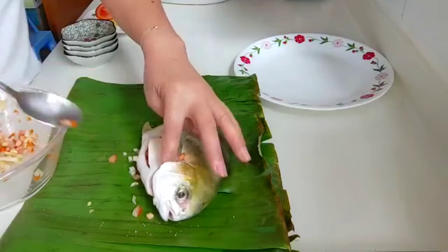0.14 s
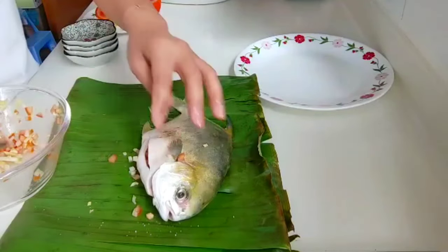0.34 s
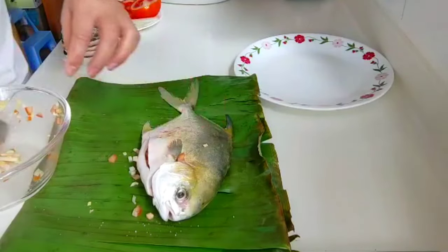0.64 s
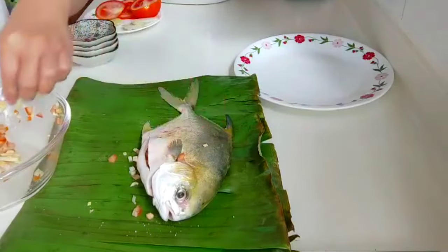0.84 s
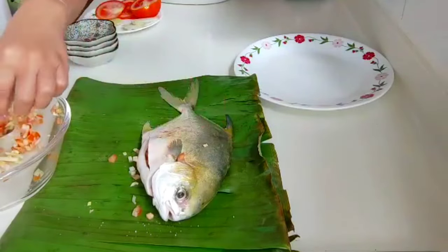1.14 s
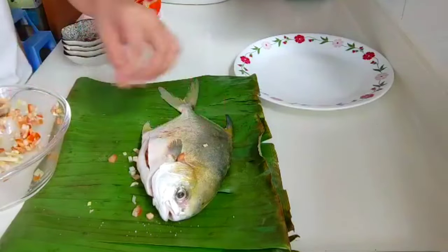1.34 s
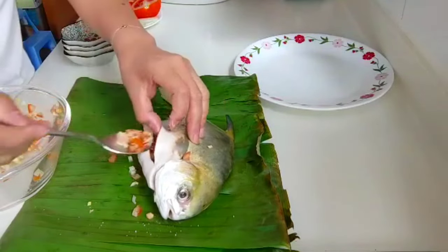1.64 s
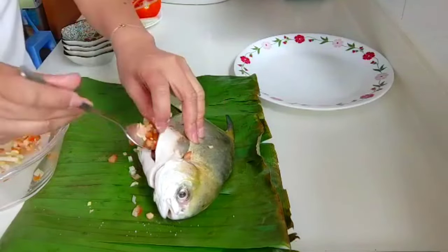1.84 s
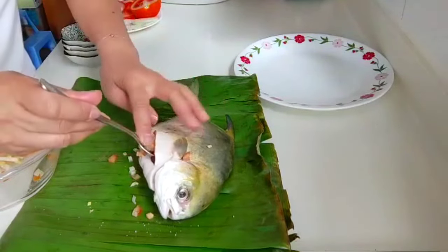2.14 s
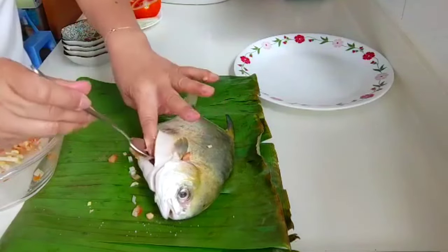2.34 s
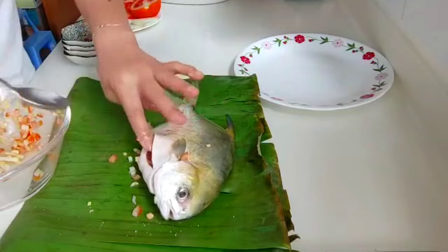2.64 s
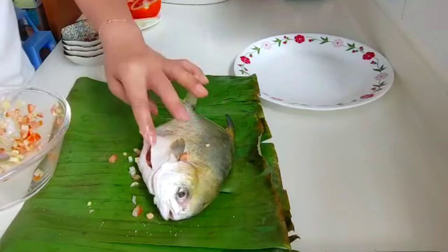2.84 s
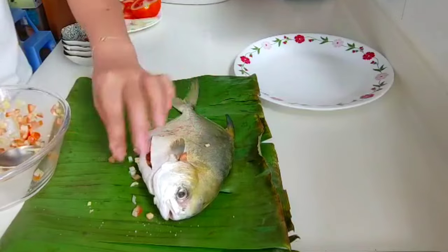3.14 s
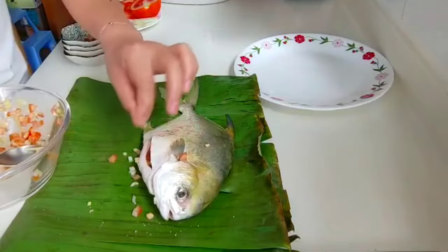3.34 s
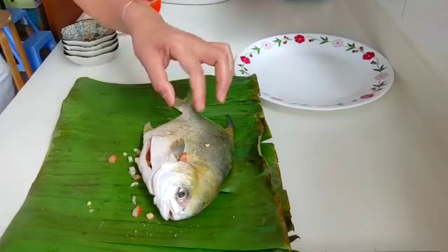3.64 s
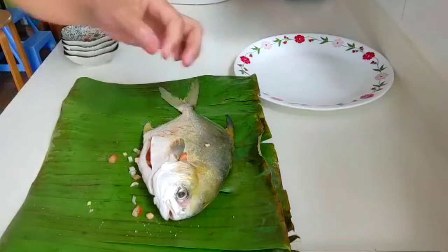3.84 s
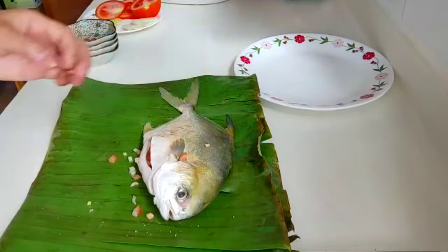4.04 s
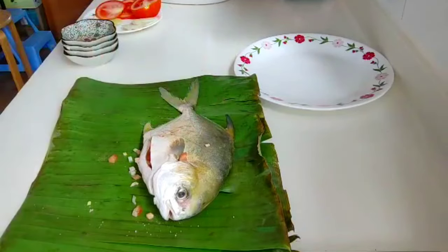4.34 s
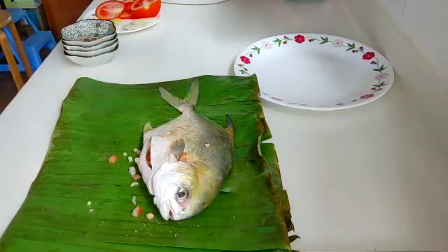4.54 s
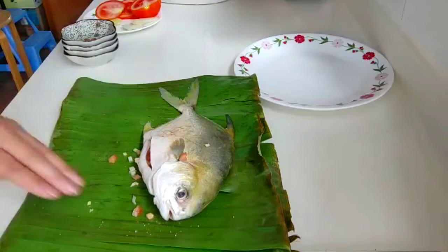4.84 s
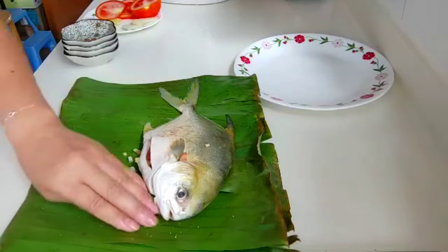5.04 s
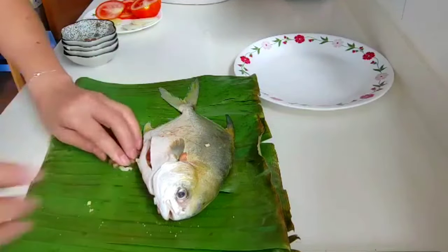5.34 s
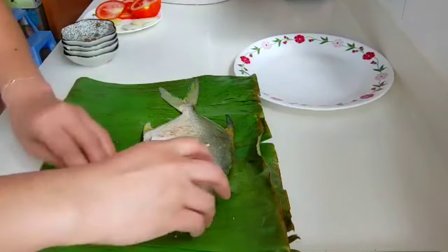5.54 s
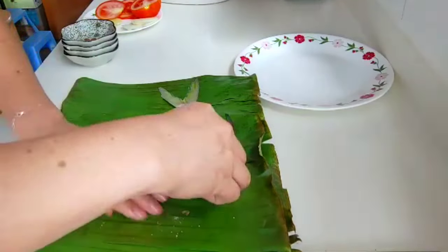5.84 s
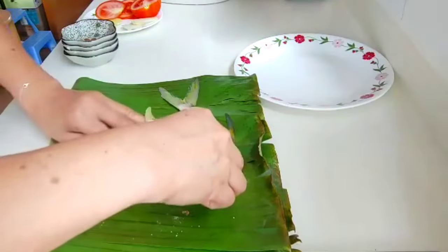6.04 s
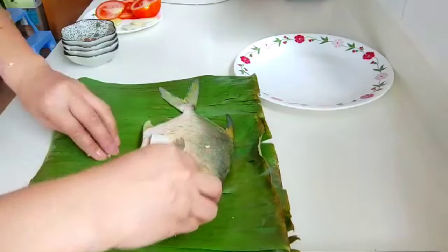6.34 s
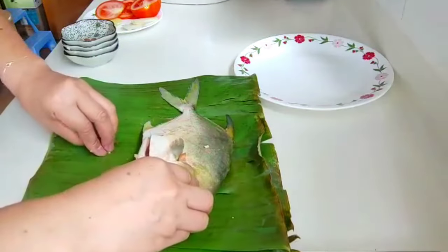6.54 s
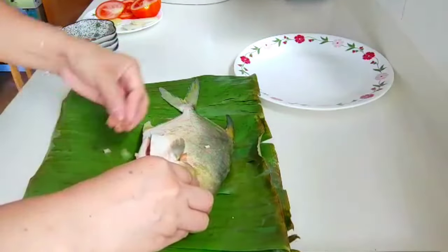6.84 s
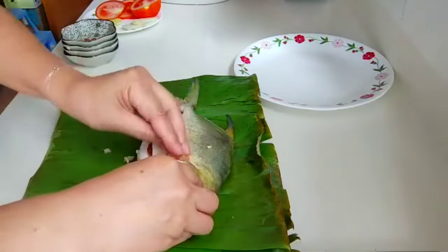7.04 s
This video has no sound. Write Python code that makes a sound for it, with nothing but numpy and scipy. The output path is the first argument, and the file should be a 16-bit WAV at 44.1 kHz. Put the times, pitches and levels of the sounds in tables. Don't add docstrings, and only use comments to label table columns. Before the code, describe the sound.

In a quiet humming kitchen, sharp spoon-on-glass clinks, a later drop, a dull bowl set-down and faint brushing of hands over a waxy leaf.

```python
import sys
import numpy as np
from scipy import signal
from scipy.fft import rfft, irfft, next_fast_len
from scipy.io import wavfile
from scipy.ndimage import uniform_filter1d, map_coordinates

SR = 44100
rng = np.random.default_rng(int(sys.argv[2]) if len(sys.argv) > 2 else 0)


def rack_gain(trim_db):
    fader = np.asarray(trim_db, float)
    return 10 ** (fader / 20)


def put_to_file(sound):
    columns = np.atleast_2d(sound).T
    safe = np.clip(columns, -1, 1)
    whole_steps = np.round(safe * 32767)
    wavfile.write(sys.argv[1], SR, whole_steps.astype(np.int16))


N = 317818
SPAN = SR // 3


def unit(x):
    return x / np.sqrt(np.mean(x ** 2) + 1e-20)


def along(points, hz):
    f, value = np.transpose(points)
    return np.interp(np.log(hz + 1), np.log(f + 1), value)


def wobble(rate):
    knots = rng.standard_normal(int(N * rate / SR) + 4)
    return map_coordinates(knots, [np.arange(N) * rate / SR])


def smooth(field, bins, frames):
    return uniform_filter1d(uniform_filter1d(field, size=bins, axis=0), size=frames, axis=1)


def filtered(x, response):
    n = x.shape[-1]
    m = next_fast_len(n + 8192)
    return irfft(rfft(x, m) * response(np.fft.rfftfreq(m, 1 / SR)), m)[..., :n]


# frequency in Hz, lead of the left port in radians.
PORT_LEAD = [(0, 2), (340, -0.14), (1210, -3), (1720, -4.5), (3600, -9.5), (6370, -21.5), (13100, -44),
             (15400, 11.5)]


def rush(spectrum, alike, patchy_db):
    z = signal.stft(rng.standard_normal((2, N + 512)), nperseg=512)[2]
    patches = unit(smooth(rng.standard_normal(z.shape[1:]), 6, 10))
    pair = signal.istft(z * rack_gain(patchy_db * patches), nperseg=512)[1][:, :N]

    def mid_side(hz):
        angle = np.arccos(np.clip(along(alike, hz), -1, 1)) / 2
        return rack_gain(along(spectrum, hz)) * [np.cos(angle), np.sin(angle)]

    mid, side = filtered(pair, mid_side)
    left_right = np.array([mid + side, mid - side])
    return unit(filtered(left_right, lambda hz: np.exp(.5j * along(PORT_LEAD, hz) * [[1], [-1]])))


# frequency in Hz, density in dB per Hz.
HUM_SPECTRUM = [(8.8, -37), (15, -7.5), (40, -6), (200, -11.5), (232, -19), (280, -16), (470, -20),
                (780, -46)]
HISS_SPECTRUM = [(310, -15), (520, -2.5), (2040, -6.5), (4750, -13.5), (5600, -18), (8550, -16),
                 (12700, -26), (13600, -40.5)]
# frequency in Hz, left-right likeness from -1 to 1.
DIFFUSE_ALIKE = [(60, 1), (130, 0.98), (290, 0.82), (640, 0.26), (1410, 0.15), (3100, 0.018), (6820, 0.085),
                 (15000, 0.49)]
# frequency in Hz, width in Hz, lift in dB.
DRONES = [(31.1, 12, 7.5), (82.5, 17, 7), (154, 30, 4), (305.4, 22, 9), (371.4, 22, 6.5), (465.4, 22, 6.5),
          (616, 19, 5.5), (1040, 49, 4.5)]


def house():
    hum = rack_gain(-53 + 0.57 * wobble(3.03)) * rush(HUM_SPECTRUM, DIFFUSE_ALIKE, patchy_db=0.5)
    hiss = rack_gain(-53.5 + 0.19 * wobble(5.05)) * rush(HISS_SPECTRUM, DIFFUSE_ALIKE, patchy_db=1.47)

    def drones(hz):
        return rack_gain(sum(db * np.exp(-((hz - centre) / width) ** 2) for centre, width, db in DRONES))

    return filtered(hum + hiss, drones)


# frequency in Hz, side minus mid in dB.
BOWL_WIDE = [(200, -8), (700, -1.5), (1300, 2.5), (2400, -1), (4400, -2), (8000, -3.5), (12000, 3)]


def ringing(force, modes):
    centre, width, gain_db = np.transpose(modes)[:, :, None]
    width = width + 15
    each = filtered(force, lambda f: 1j * f * width / (centre * centre - f * f + 1j * f * width))
    each *= rack_gain(gain_db) * np.sqrt(width) / np.linalg.norm(each, axis=1, keepdims=True)
    beam = rack_gain(along(BOWL_WIDE, centre)) * np.exp(2j * np.pi * rng.random(centre.shape))
    mid = each.sum(0)
    side = np.real(beam * signal.hilbert(each)).sum(0)
    return np.array([mid, side]) / np.abs(mid).max()


# frequency in Hz, reverberation time T60 in seconds.
KITCHEN_T60 = [(300, 0.2), (1500, 0.18), (5000, 0.22), (12000, 0.13)]


def kitchen(x):
    hz, t, z = signal.stft(rng.standard_normal((2, SPAN)), SR, nperseg=256)
    decay = rack_gain(-60 * t / along(KITCHEN_T60, hz)[:, None])
    tail = signal.istft(z * decay, SR, nperseg=256)[1][:, :SPAN]
    tail = tail * np.clip(np.arange(SPAN) / SR / 0.011 - .3, 0, 1)
    return signal.fftconvolve(x[None], tail / np.linalg.norm(tail[0]), axes=1)[:, :SPAN]


# time in seconds, level in dB relative to the contact.
BOUNCES = [(0.506, -21.5), (0.5905, -17), (0.593, -16.5), (0.6056, -1), (0.65, -34), (0.818, -7),
           (3.192, -17), (3.206, -24.5), (4.433, -6), (4.480, -4), (4.576, -3)]


def chatter(t, s, db, rise, hold):
    t60 = 0.01 if db > -15 else 0.089
    attack = np.clip((t - s) / rise, 0, 1) ** 2
    force = attack * rack_gain(-60 * np.maximum(t - s - rise - hold, 0) / t60)
    for at, relative_db in BOUNCES:
        force += (at < s + .058) * (t > at) * rack_gain(relative_db - 60 * np.abs(t - at) / 0.036)
    return force


# start in seconds, level in dB, rise in seconds, chatter in seconds,
# level of the low modes in dB.
CONTACTS = [
    (0.5079, -6, 0.0013, 0.0025, -19),
    (0.5947, -7, 0.0023, 0.0063, -9.5),
    (0.7974, -20.5, 0.0089, 0.002, -8.5),
    (0.9817, -37.5, .001, 0.003, -9.5),
    (3.1741, -9.5, 0.00095, 0.01, -10),
    (4.387, -26.5, 0.0032, 0.022, 5),
    (4.452, -26.5, 0.0039, 0.0074, -2.5),
    (4.551, -19, 0.0059, 0.019, -5),
]
# frequency in Hz, or width in Hz.
GLASS_HZ = [3900, 4025, 4530, 5570, 5650, 6360, 6830, 7060, 7550, 8010]
GLASS_WIDTH_HZ = [45, 45, 80, 30, 39.5, 35, 80, 40, 70, 29.3]
STEEL_HZ = [8260, 8565, 9050, 9660, 9810, 9960, 10700, 11120, 11790, 12110, 12500]
STEEL_WIDTH_HZ = [35, 25, 150, 40, 30, 50.2, 50, 35, 45, 45, 35]
# glass modes in dB, steel modes in dB.
RIM = [0.5, 6, -17, -33.5, -33.5, -7, -27, -24, -19.5, -16], [-1, 6, -19, -30, -22, -16, -17, -32.5, -7.5,
       -9.5, -12.5]
WALL = [-11, -15.5, -26.5, -18, -28, -11.5, -11, -21, -22, -6], [-1.5, 1, -18.5, -11, -8.5, -17.5, -12, -9,
        -3.5, -29.5, -38]
SCOOP = [-29, -7.5, -11.5, -25, -10.5, -11.5, -27, -9.5, -16, -7], [3, 2.5, -24.5, -5.5, -16, -15.5, -37.5,
         -23, -28, -19, -39.5]
TICK = [-25, -20, -24, -25, -25, -15, -24, -24, -21.5, -4], [4, -14, -15, -16.5, -23.5, -22, -30, -31, -31,
        -14, -22]
DROP = [-9.5, -7.5, -7.5, -3.5, -10.5, -9.5, -23, -16.5, -23.5, -10], [-13, 2.5, -17, -3, -20, -3, -13, -7,
        -30, -24, -47]
COUNTER = [-5, 2.5, -14, -1.5, -7, -6.5, -22, -23.5, -6.5, -14], [2, -14.5, -14, -3.5, -12, -23, -25, -20,
           -31, -21, -38]
SLIDE = [-8, -4, -6.5, -7, -2.5, -3, -25.5, -29, -4, -12], [0, -2, -15, -2, -3.5, -15.5, -11.5, -28, -32,
         -4, -40]
# frequency in Hz, width in Hz, level in dB.
LOW_RIM = [(731, 48, -8.5), (1035, 190, -2.5), (1845, 14, -1.5), (2720, 21, -15), (3150, 25, -15)]
LOW_WALL = [(740, 120, -1), (1377, 120, -1.5), (1597, 24, 4), (2027, 38, 2.5), (2590, 32, -12),
            (3310, 160, -8.5)]
LOW_SCOOP = [(312, 12, 0), (750, 110, 2), (1580, 22, 2.5), (2060, 50, -11.5), (2630, 35, -4.5)]
LOW_DROP = [(806, 38, -5.5), (1054, 51, -16.5), (1583, 100, -1), (2110, 39, -8), (2697, 35, 3.5)]
LOW_COUNTER = [(580, 42, 0), (754, 110, 4), (1116, 50, 1), (1570, 300, -2.7), (1750, 410, 0),
               (2010, 120, -4.5), (2340, 50, -8.5), (2480, 45, 3.5), (2670, 65, 3), (2800, 30, -10.5),
               (3120, 25, -25)]
# frequency in Hz, density in dB per Hz.
CLACK_HAND = [(180, -53), (300, -19), (1600, -17), (3990, -16), (5200, -27), (8370, 0), (12100, -30.5),
              (14000, -64.5)]
CLACK_COUNTER = [(29, -37), (50, -13.5), (770, 5), (3800, -15.5), (6200, -11), (7100, -26), (12200, -43),
                 (14000, -92)]
# frequency in Hz, gain in dB.
COUNTER_TOP = [(11500, 0), (12300, -5), (12600, -30), (13000, -40)]


def bowl():
    out = np.zeros((2, N + SPAN))
    spots = [RIM, WALL, SCOOP, TICK, DROP, COUNTER, COUNTER, SLIDE]
    lows = [LOW_RIM, LOW_WALL, LOW_SCOOP, LOW_RIM, LOW_DROP] + [LOW_COUNTER] * 3
    hand, counter = (CLACK_HAND, -2.5), (CLACK_COUNTER, 1.6)  # spectrum, dB against the ring
    clacks = [hand] * 5 + [counter] * 2 + [hand]
    lean, room_db = .08, -6
    for contact, (glass, steel), low, (clack, clack_db) in zip(CONTACTS, spots, lows, clacks):
        s, db, rise, hold, low_db = contact
        start = round(s * SR) - 400
        t = (start + np.arange(SPAN)) / SR
        force = chatter(t, s, db, rise, hold)
        uneven = rack_gain(1.44 * rng.standard_normal(SPAN))
        bounces = force * rng.standard_normal((2, SPAN)) * uneven

        thin = np.transpose([GLASS_HZ + STEEL_HZ, GLASS_WIDTH_HZ + STEEL_WIDTH_HZ, glass + steel])
        if s > 3:
            thin = thin + np.array([0, 22, 0])
        ring = ringing(bounces[0], thin) + rack_gain(low_db) * ringing(bounces[0], low)

        noise = filtered(bounces * np.sqrt(force),
                         lambda hz: rack_gain(along(clack, hz)) * [hz ** 0, rack_gain(along(BOWL_WIDE, hz))])
        noise = rack_gain(clack_db + 0.31 * low_db) * noise / np.abs(noise[0]).max()

        mid, side = ring + noise
        direct = np.array([mid * (1 + lean) + side, mid * (1 - lean) - side])
        heard = direct + rack_gain(room_db) * kitchen(mid)
        if s > 4:
            heard = filtered(heard, lambda hz: rack_gain(along(COUNTER_TOP, hz)))
        out[:, start:start + SPAN] += rack_gain(db) * heard
    return out[:, :N]


# middle in seconds, half length in seconds, level in dB, share of leaf from 0 to 1.
STROKES = [(1.027, .03, -57, 0.3), (1.245, 0.013, -61.5, 1), (3.588, .03, -59, 0.3),
           (3.921, 0.019, -56, 0.3), (4.026, 0.028, -50.5, 0.05), (4.163, 0.023, -66, 0.1),
           (4.314, 0.017, -77.5, .4), (4.948, 0.016, -64, 0), (5.085, 0.028, -53.5, 0.8),
           (5.122, 0.016, -47.5, 0.93), (5.186, 0.023, -57, .5), (5.3, 0.035, -73.5, 0.6),
           (5.861, 0.025, -51, 0.9), (5.92, .03, -54.5, .7), (5.965, .03, -55.5, 0.4),
           (6.148, .04, -62, 0.8)]
# frequency in Hz, density in dB per Hz.
LEAF_SPECTRUM = [(880, -36.5), (1500, 3.5), (2250, -0.5), (4050, -3.5), (9490, 5), (12500, -8),
                 (13200, -20), (13600, -40.5)]
CLOTH_SPECTRUM = [(590, -36), (1000, -11), (2980, -7.5), (4200, -10), (8330, -19.5), (12400, -27),
                  (14000, -44)]
# frequency in Hz, left-right likeness.
LEAF_ALIKE = [(2000, .1), (6000, .3), (10000, 0.2)]


def fingers():
    t = np.arange(N) / SR
    leaf_power, cloth_power = np.zeros(N), np.zeros(N)
    for middle, half, db, share in STROKES:
        power = rack_gain(2 * db) * np.exp(-((t - middle) / half) ** 2)
        leaf_power += power * share
        cloth_power += power * (1 - share)
    leaf = np.sqrt(leaf_power) * rush(LEAF_SPECTRUM, LEAF_ALIKE, patchy_db=1.5)
    cloth = np.sqrt(cloth_power) * rush(CLOTH_SPECTRUM, DIFFUSE_ALIKE, patchy_db=1.5)
    return rack_gain(2.5 * wobble(70)) * (leaf + cloth)


def scene():
    return house() + bowl() + fingers()


def blotches(shape, bins, frames):
    return unit(smooth(rng.standard_normal(shape), bins, frames))


# frequency in Hz, spread in dB.
COARSE = [(2000, 0.2), (4000, 3), (8000, 4.5), (12000, 3)]
# frequency in Hz, level against its neighbours in dB.
DROPOUT = [(2200, -40), (3000, -8), (6000, -6), (9500, -5.5), (11000, -4.3), (12500, -3.6)]
# frequency in Hz, threshold in spreads.
MONO = [(6200, -9), (6400, -.3), (9300, -.1), (10300, .6), (12500, 1.2)]


def dropouts(x):
    hz, _, z = signal.stft(x, SR, nperseg=1024)
    shape = z[0].shape
    frame = np.sum(np.abs(z[0, 60:]) ** 2, axis=0)
    quiet = 1 / (1 + frame / np.median(frame) / 30)
    z = z * rack_gain(quiet * along(COARSE, hz)[:, None] * blotches(shape, 14, 2))

    band = np.abs(smooth(np.abs(z[0]) ** 2, 7, 3)) + 1e-20
    usual = band / np.median(band, axis=1, keepdims=True)
    sunk = 10 * np.log10(usual / uniform_filter1d(usual, size=61, axis=0)) - along(DROPOUT, hz)[:, None]
    buried = 10 * np.log10(band / uniform_filter1d(band, size=161, axis=0)) + 20
    buried = buried + 60 * (hz < 4500)[:, None]
    z *= rack_gain(-18 * np.clip(.5 - np.minimum(sunk, buried) / 1.3, 0, 1))
    z[1] *= blotches(shape, 9, 6) > along(MONO, hz)[:, None] - 1.5 * (1 - quiet)
    return signal.istft(z, SR, nperseg=1024)[1][:, :N]


def low_pass(x):
    return signal.sosfilt(signal.butter(12, 15820, fs=SR, output="sos"), x)


# frequency in Hz, gain in dB.
MIC = [(13000, -0.16), (13350, -29), (13800, -34), (15700, -38), (16200, -82)]
# frequency in Hz, gain in dB.
NARROWING = [(3000, -0.16), (5500, 1), (7500, -9), (12000, -2.5)]


def record(dry):
    kept = dropouts(np.array([dry[0] + dry[1], dry[0] - dry[1]]) / 2)
    mid, side = filtered(kept, lambda hz: rack_gain(along(MIC, hz)) * [hz ** 0, rack_gain(along(NARROWING, hz))])
    return low_pass(np.array([mid + side, mid - side]))


dry = scene()
out = record(dry)
put_to_file(out)
```